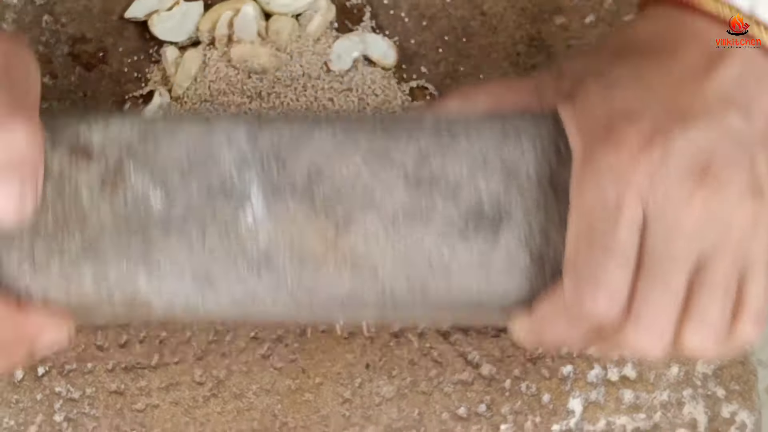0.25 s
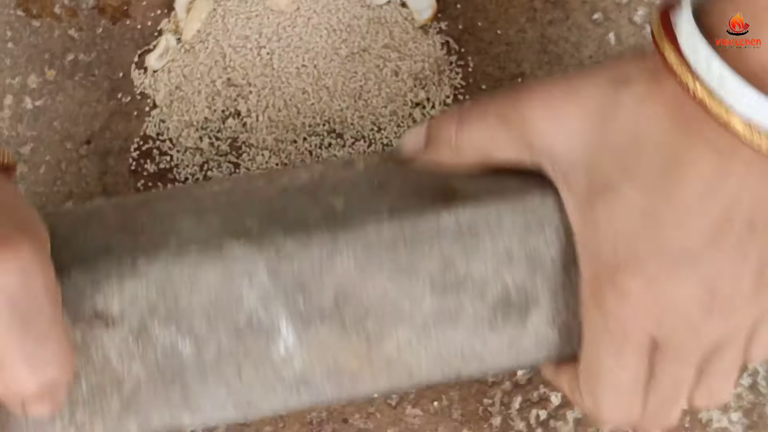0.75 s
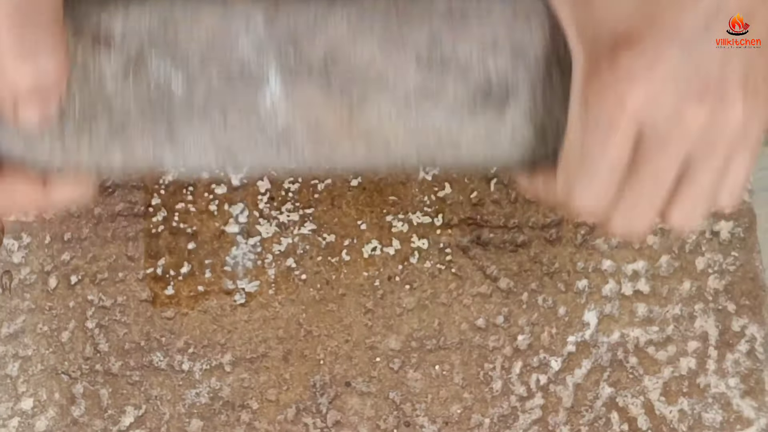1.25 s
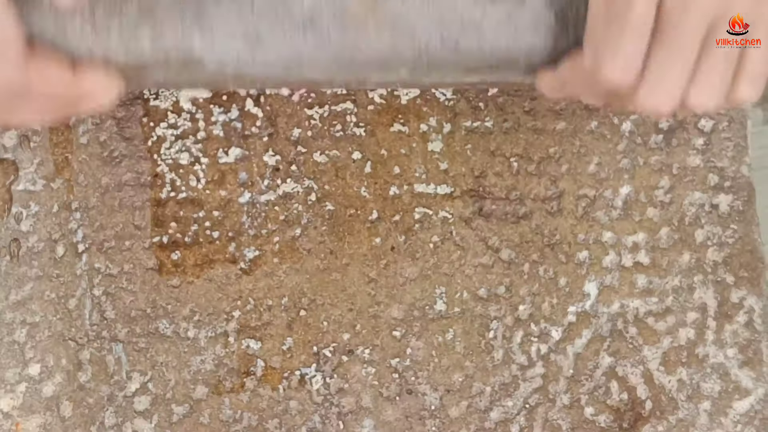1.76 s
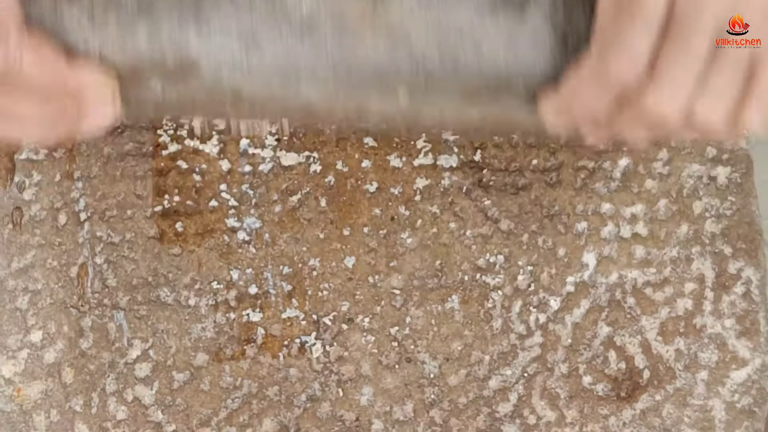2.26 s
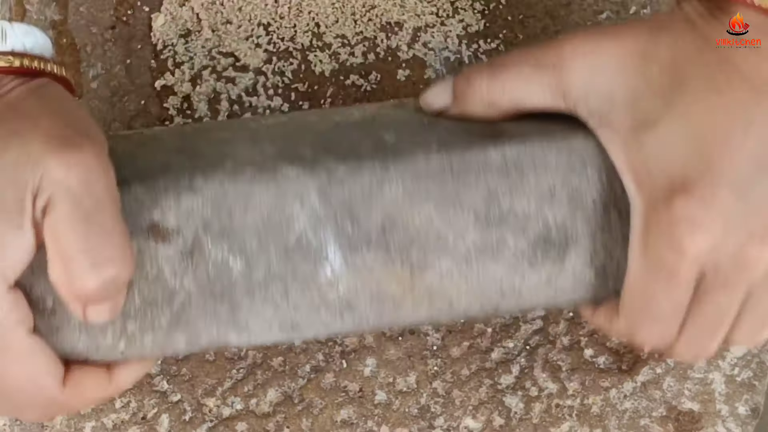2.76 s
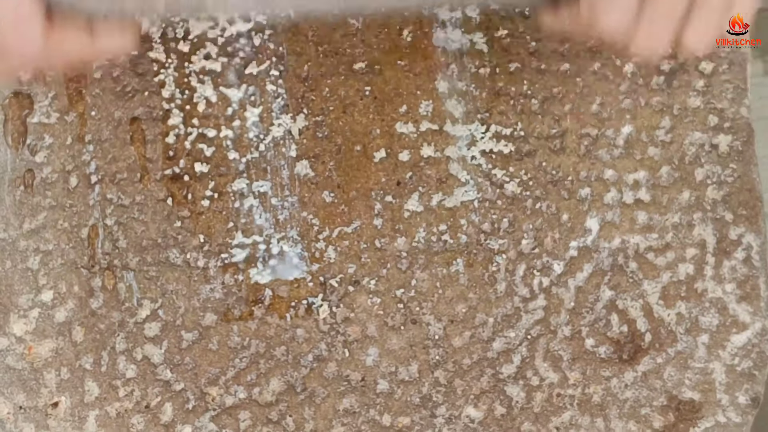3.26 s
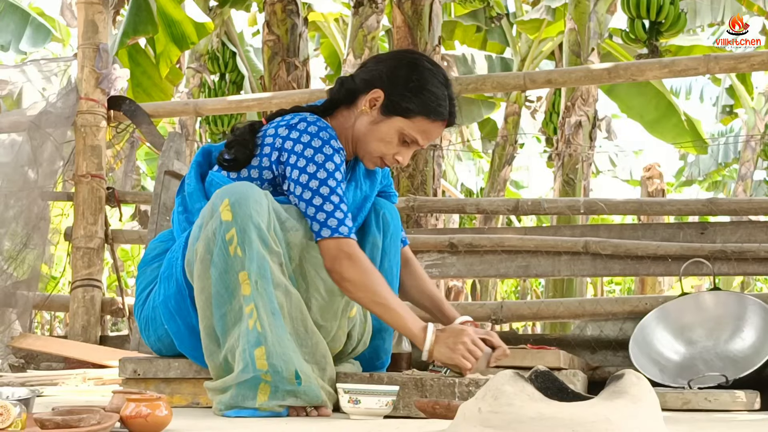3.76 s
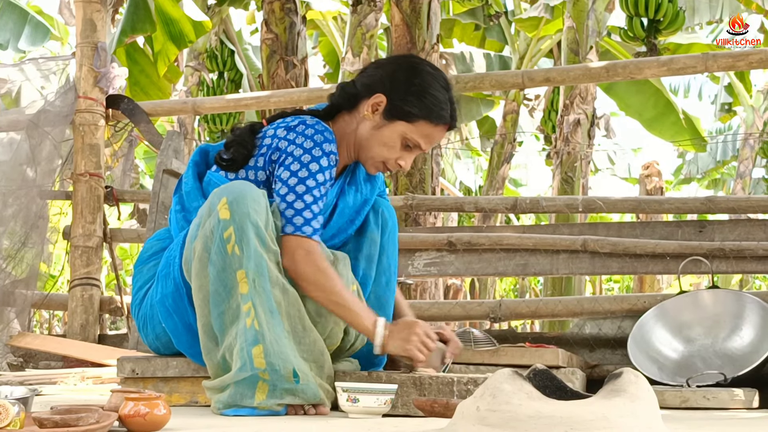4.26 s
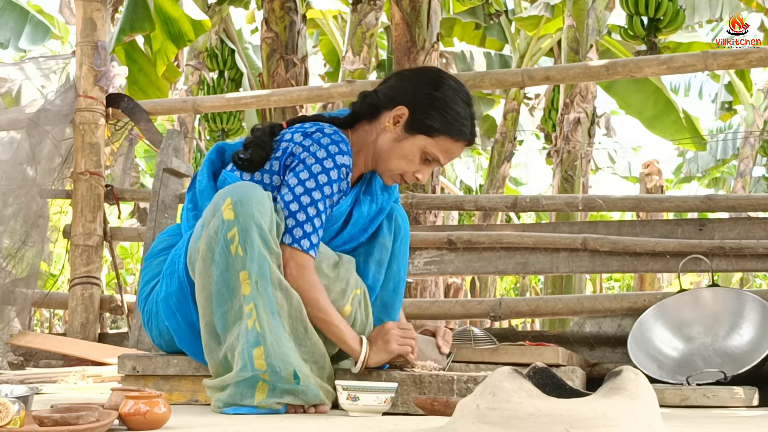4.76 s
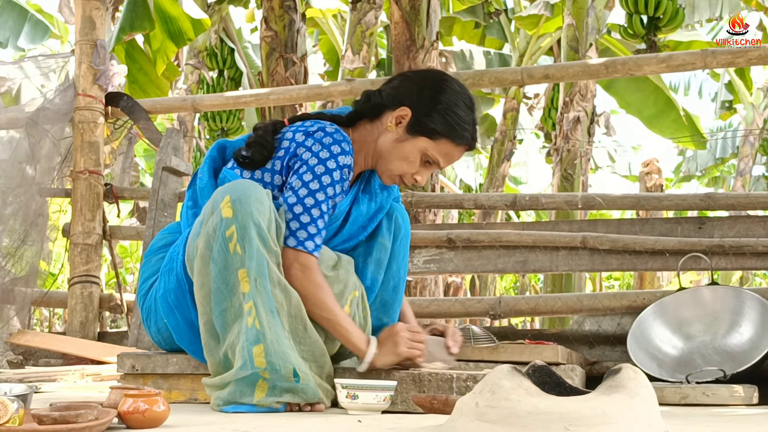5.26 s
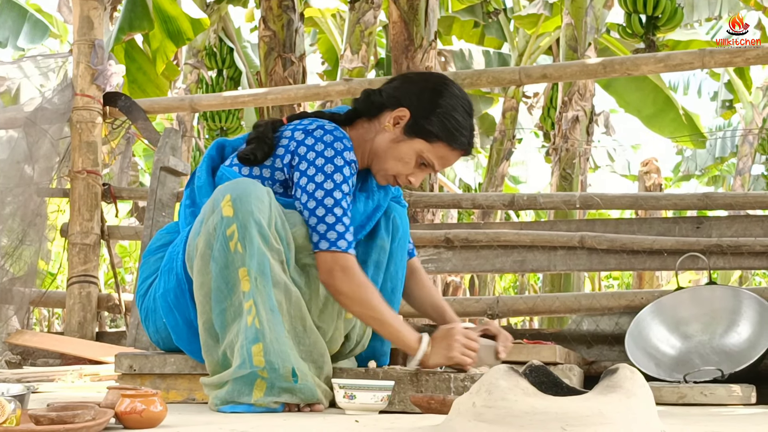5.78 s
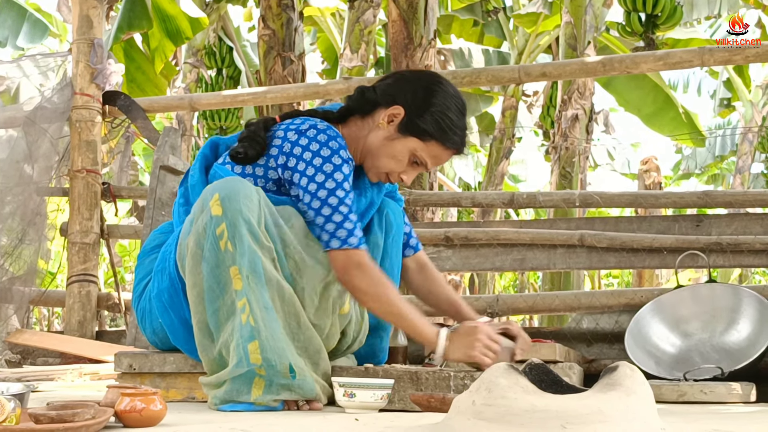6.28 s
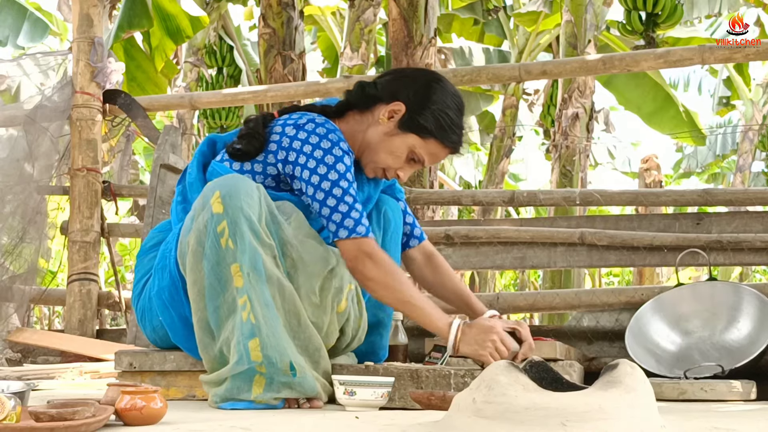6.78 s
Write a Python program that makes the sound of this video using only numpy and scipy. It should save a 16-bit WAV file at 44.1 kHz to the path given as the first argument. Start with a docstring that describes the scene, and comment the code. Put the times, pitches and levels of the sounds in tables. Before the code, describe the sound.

Hands push and pull a stone roller through seeds on a rough stone slab: dry rasp, low rumble, hard irregular knocks, grainy crackling hiss on the pulls, tiny metallic bangle ticks. The stereo microphone is close and fairly dry, in a quiet open yard with gliding bird calls. After nearly four seconds it is suddenly metres away, with faint scraping, softer knocks, birds and a brief distant double horn.

```python
"""A stone roller grinds seeds on a pitted slab outdoors, to and fro; close by, then, after a cut, a few metres off.
Tiny slips, bumps and blows ring the stones' modes, so they grate, rumble and knock.
Clouds of tiny cracks make the hiss of the crushed seeds; bangles clink as damped metal modes.
Two birds call in falling pure notes, small birds whistle, and a far vehicle hoots twice in a few
fluttering partials, over shaped noise for the open air."""
import sys
import numpy as np
from scipy import signal
from scipy.fft import rfft, irfft
from scipy.io import wavfile
from scipy.ndimage import uniform_filter1d

SR = 44100
rng = np.random.default_rng(int(sys.argv[2]) if len(sys.argv) > 2 else 0)


def digitize_waveform(pressure):
    """Quantize a signal to 16-bit integers and store it at the path in sys.argv[1].

    Rows of a 2-D input are taken as channels; values are limited to [-1, 1].
    """
    field = np.atleast_2d(pressure).T
    bounded = np.clip(field, -1, 1)
    quanta = np.round(bounded * 32767).astype(np.int16)
    wavfile.write(sys.argv[1], SR, quanta)


N = 310023
TIME = np.arange(N) / SR
CUT_S = 3.89   # the scene cuts to a view from a few metres off


# the roller is pushed away lightly and pulled back through the seeds:
# [way, start t/s, length t/s, grating level/dB, rumble level/dB, seed hiss level/dB]
STROKES = [("push", -0.1, 0.27, -45, -48.5, -72), ("pull", 0.32, .2, -53, -38.5, -55),
           ("push", 0.522, 0.21, -49, -38, -62.5), ("pull", 0.707, 0.2, -45.5, -31, -48),
           ("push", 0.907, 0.23, -51.5, -37, -62), ("pull", 1.106, 0.2, -47.5, -35, -51.5),
           ("push", 1.286, 0.23, -47.5, -35.5, -60.5), ("pull", 1.492, 0.13, -49, -31.5, -45),
           ("pull", 1.565, 0.21, -47, -37.5, -60), ("push", 1.76, 0.25, -50.5, -36.5, -66),
           ("pull", 1.975, 0.22, -50, -34.5, -47), ("push", 2.165, 0.21, -47, -32, -60),
           ("pull", 2.368, 0.22, -46.5, -36, -47), ("push", 2.57, 0.18, -49, -31, -57.5),
           ("pull", 2.721, 0.23, -46.5, -35, -46), ("push", 2.94, 0.17, -49.5, -33.5, -61.5),
           ("pull", 3.119, 0.2, -42, -36, -44.5), ("push", 3.314, 0.17, -46.5, -28.5, -58),
           ("pull", 3.491, 0.19, -42.5, -35, -43), ("push", 3.71, 0.13, -49.5, -29, -57),
           ("push", 3.939, 0.19, -55.5, -52, -66), ("pull", 4.08, 0.24, -65, -54, -56.5),
           ("push", 4.32, 0.32, -56, -71, -66.5), ("pull", 4.515, 0.24, -70, -47, -59),
           ("push", 4.783, 0.13, -62, -67, -64), ("pull", 4.94, 0.22, -64, -61, -58.5),
           ("push", 4.7, 0.17, -67, -55, -59), ("pull", 5.383, 0.18, -61, -49, -51),
           ("push", 5.645, 0.13, -78, -63, -68.5), ("pull", 5.81, 0.24, -63.5, -55, -58.5),
           ("push", 5.5, .172, -56, -56, -70), ("pull", 6.285, .23, -63.5, -60, -56.5),
           ("push", 6.579, 0.14, -67, -67, -71), ("pull", 6.721, 0.23, -59, -53.5, -59),
           ("push", 6.97, 0.18, -84, -57, -78)]
# the roller catches on bare stone and chatters: [start t/s, length t/s, judder level/dB, rasp level/dB]
CATCHES = [(-.012, 0.13, -33, -45.5), (0.571, .042, -25, -38), (1.573, .15, -30, -31),
           (1.807, 0.086, -25, -40.5), (2.07, 0.095, -34.5, -44.5), (2.222, 0.054, -28, -45),
           (2.626, 0.091, -35.5, -52), (2.861, 0.059, -42.5, -64), (2.965, 0.067, -38, -47),
           (4.104, 0.078, -51, -63), (4.36, 0.11, -42, -53), (4.47, 0.029, -47, -59),
           (4.884, 0.059, -44, -66), (5.272, 0.078, -46, -59), (5.389, 0.11, -45, -57),
           (5.79, .07, -51.5, -71), (6.158, 0.16, -44.5, -57.5)]
# arch of the grating for push and pull: [share of the stroke at which it peaks, steepness]
GRATE_SWELL = {"push": (.48, 2.07), "pull": (0.49, 1.72)}
# arch of a catch: [share of the catch at which it peaks, steepness]
CATCH_SWELL = (0.42, .8)
# modes of the slab: [f/Hz, level/dB, decay by 60 dB t/s]
SLAB_MODES = [(546, 7, 0.021), (672, 4.5, 0.037), (882, -2.5, 0.03), (1046, 6, 0.015), (1315, 7, 0.012),
              (1448, -1, 0.029)]
# modes of the roller: [f/Hz, level/dB, decay by 60 dB t/s]
ROLLER_MODES = [(1880, 2.5, 0.055), (2073, -6, 0.07), (2227, -2, 0.0089), (2700, -12, 0.012),
                (3670, -34, 0.14), (4250, -9.5, 0.0087), (5570, -21.5, 0.015)]
# dry crunch of grit between the stones: [f/Hz, level/dB per Hz]
GRIT_COLOUR = [(300, -62), (600, -14), (850, 0), (1400, -1.5), (1650, -4), (2200, 4), (2650, -9),
               (3300, -24), (4250, -13.5), (5200, -42), (9000, -61)]
PITS_PER_S, PIT_DB = 30, 2   # the pitted slab makes the grating uneven
STROKE_RASP_DB, FAR_RASP_DB = 1, -10.5   # rasp against grating; its change from a few metres off
RING_DB, GRIT_DB = 1, -1.5   # the roller's ring and the grit within the rasp


def grating():
    """Tiny slips ring both stones: coarse ones shake the slab, fine ones make the roller rasp."""
    judder_moves = [(s, length, db, GRATE_SWELL[way]) for way, s, length, db, _, _ in STROKES]
    judder_moves += [(s, length, db, CATCH_SWELL) for s, length, db, _ in CATCHES]
    rasp_moves = [(s, length, db + STROKE_RASP_DB + FAR_RASP_DB * (s > CUT_S), GRATE_SWELL[way])
                  for way, s, length, db, _, _ in STROKES]
    rasp_moves += [(s, length, db, CATCH_SWELL) for s, length, _, db in CATCHES]
    pits_db = PIT_DB * drift(PITS_PER_S)
    judder_db = pits_db + swells(judder_moves)
    rasp_db = pits_db + swells(rasp_moves)

    coarse = grains(650, spread_db=0)
    fine = grains(3500, spread_db=-0.5)
    judder = even(butter(ring(coarse, SLAB_MODES), 393, "high", order=5), 0.078)
    # pressed hard, the roller chatters at the lowest modes of the slab
    chatter = even(butter(ring(coarse, SLAB_MODES[:2]), [450, 720], "band"), 0.039)
    pressed = np.clip((judder_db + 41.5) / 16, 0, 1)
    slab = from_db(judder_db + 3) * (1 - 0.56 * pressed) * judder
    slab = slab + from_db(judder_db + 2) * pressed * chatter

    rasp = even(butter(ring(fine + coarse, ROLLER_MODES), 1180, "high"), 0.036)
    grit_gain = from_db(at_hz(GRIT_COLOUR, np.fft.rfftfreq(N, 1 / SR)))
    grit = irfft(rfft(grains(2500, spread_db=3.5)) * grit_gain, N)
    return slab + from_db(rasp_db) * (from_db(RING_DB) * rasp + from_db(GRIT_DB) * grit / rms(grit))


# arch of the rumble for push and pull: [share of the stroke at which it peaks, steepness]
RUMBLE_SWELL = {"push": (.54, 3.2), "pull": (0.54, 1.87)}
# the slab groans as it shifts on its bed: [middle t/s, f/Hz, level/dB]
GROANS = [(.776, 132, -17.5), (1.355, 210, -28), (1.393, 190, -33.5), (1.424, 205, -38),
          (4.645, 173, -37.5)]


def rumble():
    """Bumps over the pits rock the heavy slab on its bed; now and then it slips with a short groan."""
    rocking_modes = [(123.8, -0.5, 0.064), (177, -10.5, 0.013), (251, -14.5, 0.025)]   # f/Hz, level/dB, t/s
    rock = ring(grains(400, spread_db=1.5), rocking_modes)
    level_db = swells([(s, length, db, RUMBLE_SWELL[way]) for way, s, length, _, db, _ in STROKES])
    out = from_db(level_db + 0.5) * even(butter(rock, [85, 260], "band"), 0.03)
    t = TIME[:SR // 5] - 1 / 10
    for s, hz, db in GROANS:
        groan = np.exp(-(t / 0.011) ** 2) * np.sin(2 * np.pi * (hz * t + rng.random()))
        add(out, s - 1 / 10, from_db(db + 0.5) * groan)
    return butter(out, 104, "high", order=4)


# the roller knocks on the slab: [t/s, blow level/dB, ring of the roller level/dB against the contact]
KNOCKS = [(0.02, -14, -1), (0.355, -7.5, 8.5), (0.461, -6.5, 5.5), (1.238, -21, -20), (1.573, -13.5, -4),
          (1.683, -5.5, 3.5), (1.749, -32, -25), (1.911, -17, 2), (1.99, -24.5, 5), (2.235, -20, -15),
          (2.532, -33, -24), (2.639, -22.5, -1), (2.659, -19.5, -7), (2.731, -20, -2.5), (3.014, -11.5, 5),
          (3.417, -12, 0.0), (3.437, -18.5, 9), (3.786, -14.5, 5.5), (3.796, -16.5, -1), (3.816, -18, 10.5),
          (3.844, -29, -2), (4.123, -28, -15), (4.375, -47, -7), (4.49, -29.5, -14), (4.865, -32.5, -16),
          (4.907, -22, -3), (5.296, -26, -1), (6.184, -29, -12), (6.214, -26.5, -23), (6.262, -24, -1),
          (6.301, -26, -15)]
CONTACT_S = 0.00016   # half-width of the force of a blow at 0 dB
CONTACT_DELAY_S = 0.001393   # from the first touch to the peak of the force
BLUNTING = 0.087   # weak blows last longer, by this power of their strength
REBOUND_S, REBOUND = 0.002294, 0.33   # typical delay, varied with each blow; strength
KNOCK_DB, KNOCK_SLAB_DB, KNOCK_RING_DB = 3, -6.5, -8.5   # all knocks; slab and roller against the contact


def knocks():
    """A blunt contact, a rebound a few milliseconds later and a short rattle; hard blows are brighter."""
    out, t = np.zeros(N), TIME[:SR // 6]
    for s, blow_db, ring_db in KNOCKS:
        touches = 0.037 * rng.standard_normal(len(t)) * np.exp(-t / 0.0065)
        touches[0] += 1
        touches[int(SR * REBOUND_S * rng.uniform(.8, 1.4))] += REBOUND
        width_s = CONTACT_S * from_db(blow_db) ** -BLUNTING
        contact = np.exp(-((t[t < 10 * CONTACT_DELAY_S] - CONTACT_DELAY_S) / width_s) ** 2)
        force = signal.lfilter(contact, [1], touches)
        thud = peak_one(butter(butter(force, 597, "high", order=3), 2580, "low", order=4))
        slab = peak_one(butter(ring(force, SLAB_MODES), 456, "high", order=4))
        roller = peak_one(ring(force, ROLLER_MODES))
        sound = thud + from_db(KNOCK_SLAB_DB) * slab + from_db(ring_db + KNOCK_RING_DB) * roller
        add(out, s, from_db(blow_db + KNOCK_DB) * peak_one(sound))
    return out


# close by, the stones lie off to the left: [f/Hz, phase lead of the left in radians]
STONE_PHASE = [(20, 0), (500, 0.36), (1000, 1.04), (1450, 1.5), (1950, 2.5), (2400, 4), (2700, 4.5),
               (4300, 7.5)]
# the roller's main mode rings from its right end: [f/Hz, left minus right level/dB]
STONE_LEAN = [(500, 1), (1450, 1), (1900, -5.5), (2150, -6.5), (2450, 5.5), (4300, 1)]


def near_stones(x):
    """Close by, the stones reach the left microphone first, with a little echo from the yard."""
    hz = np.fft.rfftfreq(N, 1 / SR)
    ears = np.array([[.5], [-.5]])
    lean = from_db(ears * at_hz(STONE_LEAN, hz))
    lead = np.exp(1j * ears * at_hz(STONE_PHASE, hz))
    direct = irfft(rfft(x) * lean * lead, N)
    return from_db(1.5) * direct + from_db(-10.5) * scatter(x, t60=0.1, gap_s=0.0042)


def distant_stones(x):
    """From a few metres the stones lie almost straight ahead, thinner, with a hollow ring and more echo."""
    x = butter(butter(x, 603, "high", order=4), 3200, "low")
    x = x + butter(x, [720, 900], "band", order=1)
    direct = pair(x, lag_s=0, lean_db=0.5)
    return from_db(-2.5) * direct + from_db(-3) * scatter(x, t60=0.056, gap_s=0.0028)


# arch of the hiss; a pull meets the seeds early, a push late: [share of the stroke at its peak, steepness]
HISS_SWELL = {"push": (0.71, 0.66), "pull": (0.38, 3.17)}
# spectrum of the cracking seeds: [f/Hz, level/dB per Hz]
SEED_COLOUR = [(1410, -8), (2400, -0.5), (2750, -1.5), (3140, -2), (4250, -1.5), (4680, -5), (5140, -4),
               (7470, -10.5), (10300, -0.5), (11700, -12.5), (14700, -24.5), (15600, -30), (16000, -57)]
# lean of the hiss: [f/Hz, left minus right level/dB]
SEED_LEAN = [(2500, 3), (4000, -2.5), (6000, -0.5), (8000, -6.5), (10000, 6), (12000, 5.5), (15000, 5)]
# treble of the hiss, dull at first, brightest in the far view: [t/s, level/dB]
HISS_TREBLE = [(0, -9), (.8, 5), (1.5, 2), (3.8, 6), (4.5, 5), (7, 11)]
RESTING_HISS_DB = -74   # loose meal, between strokes


def seeds():
    """Thousands of tiny cracks a second merge into a hiss; a few larger seeds snap out of it."""
    hz = np.fft.rfftfreq(N, 1 / SR)
    small_and_large = 0.3 * grains(3700, spread_db=2) + 1.1 * grains(160, spread_db=4)
    shared = pair(small_and_large, lag_s=0.000223, lean_db=-3)
    cracks = shared + np.array([grains(6000, spread_db=3) for ear in range(2)])
    colour = from_db(at_hz(SEED_COLOUR, hz) + at_hz(SEED_LEAN, hz) * np.array([[.5], [-.5]]))
    spectrum = rfft(cracks) * colour
    treble = np.clip((hz - 10500) / 1500, 0, 1)
    hiss = irfft(spectrum * (1 - treble), N) + from_db(in_time(HISS_TREBLE)[0]) * irfft(spectrum * treble, N)
    hiss = butter(hiss, 2680, "high")
    crushing = from_db(swells([(s, length, db, HISS_SWELL[way]) for way, s, length, _, _, db in STROKES]))
    level = np.hypot(crushing, from_db(RESTING_HISS_DB))
    return hiss / rms(hiss.mean(0)) * level * from_db(3 + 1.85 * drift(110))


# bangles touch: [t/s, level/dB]
CLINKS = [(0.175, -42.5), (0.3754, -34.5), (0.523, -44.5), (0.7244, -37), (0.8898, -37.5), (0.9085, -27.5),
          (1.1209, -34.5), (1.3024, -36), (1.476, -40), (1.5202, -29), (1.6317, -40), (1.7437, -41),
          (2.176, -31), (2.413, -27.5), (2.5541, -25.5), (2.744, -25), (2.9155, -34.5), (3.1029, -33),
          (3.295, -37), (3.481, -35), (3.675, -29), (3.7387, -40.5), (3.85, -44), (4.109, -47),
          (5.419, -39), (6.046, -40)]
# modes of a freely ringing bangle: [f/Hz, level/dB, decay by 60 dB t/s]
BANGLE_MODES = [(2702, 5, 0.057), (2873, -8.5, 0.14), (4175, -7, 0.15), (4390, 4, 0.019),
                (7750, -7.5, 0.049), (8140, -6.5, 0.099), (8800, -4.5, 0.019), (9420, -2.5, 0.046),
                (10900, 9.5, 0.0082), (11830, 8, 0.0057), (12470, -6, 0.083), (12300, -17, 0.027),
                (14320, -13, 0.0071)]


def bangles():
    """Each touch is a tick and a brief chatter; the wrist damps and detunes the modes anew each time."""
    out, t = np.zeros((2, N)), TIME[:SR // 6]
    for s, clink_db in CLINKS:
        chatter = rng.standard_normal(len(t)) * (rng.random(len(t)) < 1500 / SR)
        force = 0.61 * chatter * np.exp(-t / 0.0079)
        force[0] += 1
        detune = rng.normal(1, 0.018, len(BANGLE_MODES))
        damping = rng.uniform(0.18, 0.99)
        for ear, lean_db in zip(out, (2.5, -1)):
            modes = [(hz * d, db + 4 * rng.standard_normal(), t60 * damping)
                     for d, (hz, db, t60) in zip(detune, BANGLE_MODES)]
            tick = peak_one(butter(force, 4600, "high"))
            sound = from_db(-3) * peak_one(ring(force, modes)) + tick
            add(ear, s, from_db(clink_db + lean_db + 2.5) * peak_one(sound))
    return butter(out + scatter(out.mean(0), t60=0.076, gap_s=0.0038), 2600, "high")


# a bird whoops in threes: [first note t/s, spacing t/s, first, second and third note level/dB]
WHOOPS = [(.637, 0.071, -16.5, -16.5, -25.5), (1.392, 0.072, -15.5, -22.5, -26),
          (2.166, 0.082, -15.5, -20, -24.5), (2.655, .067, -43, -31, -26.5),
          (3.326, 0.065, -27.5, -28.5, -27.5), (4.117, 0.069, -35.5, -35, -34),
          (4.752, .067, -37, -36.5, -33.5), (5.398, 0.064, -39, -32.5, -30.5),
          (6.053, 0.064, -39, -35, -31), (6.712, .068, -36, -33.5, -32)]
# its three notes, before a slight random detuning: [start f/Hz, end f/Hz, swell t/s]
WHOOP_NOTES = [(1469, 850, 0.011), (1362, 897, 0.0086), (1347, 980, 0.011)]
# a second bird slurs down to a held note: [middle of the fall t/s, level/dB]
SLURS = [(0.509, -27.5), (1.276, -25), (1.352, -35.5), (1.966, -34.5), (2.036, -29), (2.527, -39),
         (3.095, -54), (3.96, -52.5), (4.603, -47.5), (5.91, -48.5), (6.57, -52)]


def birds():
    """Two low-voiced birds glide downwards; in each triplet the notes fall less and less."""
    out = np.zeros(N)
    for s, spacing_s, *levels in WHOOPS:
        for k, (db, (start_hz, end_hz, swell_s)) in enumerate(zip(levels, WHOOP_NOTES)):
            note = slur(start_hz, end_hz, 0.01203, swell_s, held_db=-12.5, held_s=0.026)
            add(out, s + k * spacing_s - 1 / 10, from_db(db - 4.5) * note)
    for s, db in SLURS:
        note = slur(1400, 802.5, glide_s=0.0114, swell_s=0.015, held_db=1, held_s=0.026)
        add(out, s - 1 / 10, from_db(db - 7) * note)
    return out


def slur(start_hz, end_hz, glide_s, swell_s, held_db, held_s):
    """A pure note, 0.2 s with its fall in the middle: it swells as it falls, then holds the low pitch."""
    t = TIME[:SR // 5] - 1 / 10
    hz = end_hz + (start_hz - end_hz) * (1 - np.tanh(t / glide_s)) / 2
    level = np.exp(-(t / swell_s) ** 2) + from_db(held_db) * np.exp(-(2 * (t - held_s) / held_s) ** 2)
    return np.sqrt(2) * level * np.sin(2 * np.pi * np.cumsum(hz * rng.normal(1, 0.01084)) / SR)


# a thin whistle falls: [t/s, f/Hz, level/dB]
FALLING_WHISTLE = [(.24, 3090, -59), (.265, 3050, -59), (.28, 2440, -47.5), (.30, 2040, -45),
                   (.325, 1760, -53), (.35, 1760, -58)]
# a second whistle rises and arches over it: [t/s, f/Hz, level/dB]
ARCHING_WHISTLE = [(.18, 3320, -67), (.21, 3630, -60), (.235, 3500, -69), (.28, 3430, -65),
                   (.295, 4250, -57), (.31, 4600, -57), (.322, 4030, -64), (.35, 3580, -57)]
# the horn's two hoots: [t/s, level/dB]
HORN = [(5.02, -68), (5.06, -53.5), (5.19, -53.5), (5.215, -91), (5.24, -50.5), (5.31, -54.5),
        (5.39, -57.5), (5.45, -81)]
# the horn's partials: [multiple of the fundamental, level/dB]
HORN_PARTIALS = [(7, -14), (8, 2), (9, -4.5), (10, -22), (11, -20)]


def far_sounds():
    """Small birds whistle; a buzzing horn carries only its strongest partials this far."""
    phase = 2 * np.pi * np.cumsum(430 * (1 + 0.0086 * drift(140))) / SR   # fluttering fundamental
    horn = sum(from_db(db + 2.7 * drift(25)) * np.sin(k * phase) for k, db in HORN_PARTIALS)
    horn = horn * from_db(in_time(HORN)[0]) * (TIME > HORN[0][0]) * (TIME < HORN[-1][0])
    whistles = whistle(FALLING_WHISTLE) + whistle(ARCHING_WHISTLE)
    direct = pair(0.77 * whistles + 1.06 * horn, lag_s=0, lean_db=-14)
    return direct + from_db(3) * scatter(0.66 * whistles + horn, t60=0.51, gap_s=0.0047)


def whistle(rows):
    """A pure tone that follows a line of pitch and level."""
    hz, db = in_time(rows)
    tone = np.sin(2 * np.pi * np.cumsum(hz) / SR)
    return from_db(db) * tone * (TIME > rows[0][0]) * (TIME < rows[-1][0])


# spectrum of the outdoor air: [f/Hz, level/dB per Hz]
YARD_COLOUR = [(15, -55), (26, -5.5), (50, 2.5), (94, -1.5), (206, -9.5), (405, -20), (575, -21.5),
               (754, -29), (863, -16.5), (1100, -20), (1560, -27), (4250, -36.5), (6920, -68.5),
               (10400, -54), (14400, -53), (16000, -83)]
# left-right likeness of the air: [f/Hz, coherence from 0 to 1]
YARD_LIKENESS = [(30, 0.5), (100, 0.95), (300, 0.6), (700, 0.4), (1200, 0), (4000, 0)]


def yard():
    """Steady outdoor air as shaped noise, most alike at both ears in the bass."""
    hz = np.fft.rfftfreq(N, 1 / SR)
    mid, side = rfft(rng.standard_normal((2, N))) * from_db(at_hz(YARD_COLOUR, hz))
    alike = np.clip(at_hz(YARD_LIKENESS, hz), -1, 1)
    air = irfft(np.sqrt(1 + alike) * mid + np.sqrt(1 - alike) * side * [[1], [-1]], N)
    return from_db(-49) * air / rms(air.mean(0))


def scatter(x, t60, gap_s):
    """Diffuse echoes from fence, ground and leaves, different at each ear."""
    t = TIME[:SR // 2]
    tail = rng.standard_normal((2, len(t))) * np.exp(-np.log(1000) * t / t60) * (t > gap_s)
    return signal.fftconvolve(x[None], tail / np.sqrt(np.sum(tail ** 2) / 2), axes=1)[:, :N]


def pair(x, lag_s, lean_db):
    """Two microphones: the left one leads by the lag and is louder by the lean."""
    left = late(x, -lag_s / 2) * from_db(lean_db / 2)
    right = late(x, lag_s / 2) * from_db(-lean_db / 2)
    return np.array([left, right])


def late(x, s):
    """The sound delayed."""
    return np.interp(TIME - s, TIME, x, left=0)


def swells(moves):
    """Level in dB of moves (start s, length s, dB, (peak share, steepness)), each an arch from rest to rest."""
    power = np.zeros(N)
    for s, length_s, db, (peak_share, steepness) in moves:
        during = slice(*np.searchsorted(TIME, [s, s + length_s]))
        # time is warped so that the arch peaks at its share of the move
        along = ((TIME[during] - s) / length_s) ** (np.log(.5) / np.log(peak_share))
        power[during] += (from_db(db) * np.abs(np.sin(np.pi * along)) ** steepness) ** 2
    return 10 * np.log10(power + 1e-14)


def grains(per_s, spread_db):
    """Random clicks of uneven size and sign."""
    clicks = rng.random(N) < per_s / SR
    size = from_db(spread_db * np.minimum(rng.exponential(1, N), 4))
    return clicks * size * rng.choice([-1, 1], N)


def ring(force, modes):
    """Sum of the damped modes that a force sets ringing."""
    out = 0
    for k, (hz, db, t60) in enumerate(modes):
        r, w = np.exp(-np.log(1000) / (t60 * SR)), 2 * np.pi * hz / SR
        mode = signal.lfilter([0, np.sin(w)], [1, -2 * r * np.cos(w), r * r], force + 1e-18)
        out = out + (-1) ** k * from_db(db) * mode
    return out


def even(x, window_s):
    """Holds the short-term level of a vibration at 1."""
    return x / np.sqrt(np.abs(uniform_filter1d(x ** 2, max(int(window_s * SR), 2))) + 1e-14)


def drift(rate):
    """Slow chance with a spread of about 1, by straight lines between random knots, rate per second."""
    knots = rng.standard_normal(4000)
    return np.interp(TIME * rate, np.arange(len(knots)), knots)


def butter(x, hz, kind, order=2):
    """Causal low-, high- or band-pass."""
    return signal.sosfilt(signal.butter(order, hz, kind, fs=SR, output="sos"), x + 1e-18)


def at_hz(points, hz):
    """A spectrum read on a log-frequency axis."""
    return np.interp(np.log(hz + 1), np.log(np.array(points)[:, 0]), np.array(points)[:, 1])


def in_time(rows):
    """Each column of a curve at every sample."""
    s, *columns = np.transpose(rows)
    return [np.interp(TIME, s, c) for c in columns]


def add(track, s, sound):
    """Mixes a short sound in at a time."""
    i = max(round(s * SR), 0)
    track[i:i + len(sound)] += sound[:N - i]


def peak_one(x):
    """Scaled to a peak of 1."""
    return x / np.abs(x).max()


def rms(x):
    """Root mean square."""
    return np.sqrt(np.mean(x ** 2) + 1e-20)


def from_db(db):
    """Decibels to gain."""
    return 10 ** (np.asarray(db) / 20)


def scene():
    """The scene cuts to a view from a few metres off: thinner stones, and birds from the other side."""
    far = np.clip((TIME - CUT_S) * 20, 0, 1)
    stones, calls = grating() + knocks(), birds()
    work = near_stones(stones * (1 - far)) + distant_stones(stones * far)
    # the rumble reaches the left microphone first
    work = work + pair(rumble(), lag_s=0.0002, lean_db=0.6) + seeds() + bangles()
    song = pair(calls * (1 - far), lag_s=0.00031, lean_db=-1)
    song = song + pair(calls * far, lag_s=-0.00032, lean_db=0.5)
    # one clear echo from the right, then the yard's tail
    song = song + from_db(-9) * pair(late(calls, 0.0065), lag_s=-0.00013, lean_db=-10)
    song = song + from_db(-5) * scatter(calls, t60=0.28, gap_s=0.01)
    return work + song + far_sounds() + yard()


def record(dry):
    """The top is cut steeply above 16 kHz."""
    return signal.sosfiltfilt(signal.ellip(10, .05, 70, 16000, fs=SR, output="sos"), dry)


dry = scene()
out = record(dry)
digitize_waveform(out)
```